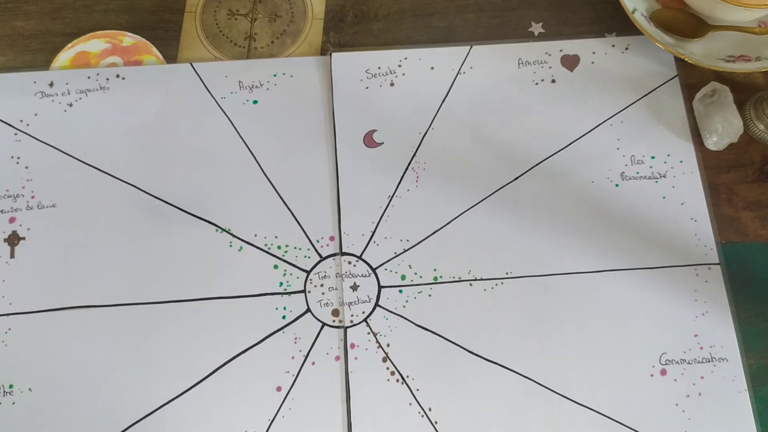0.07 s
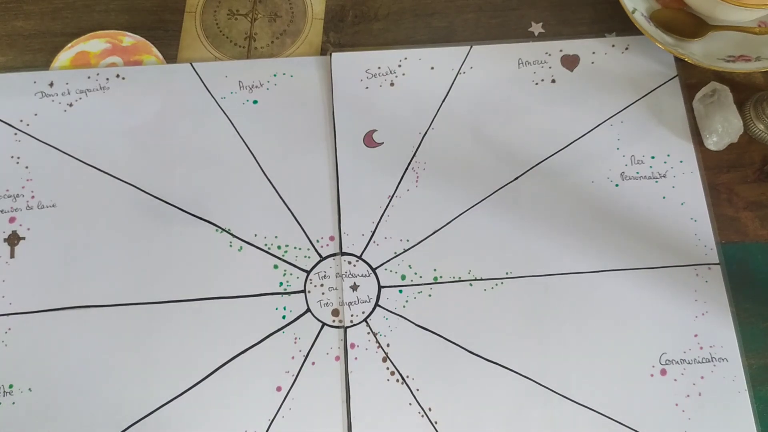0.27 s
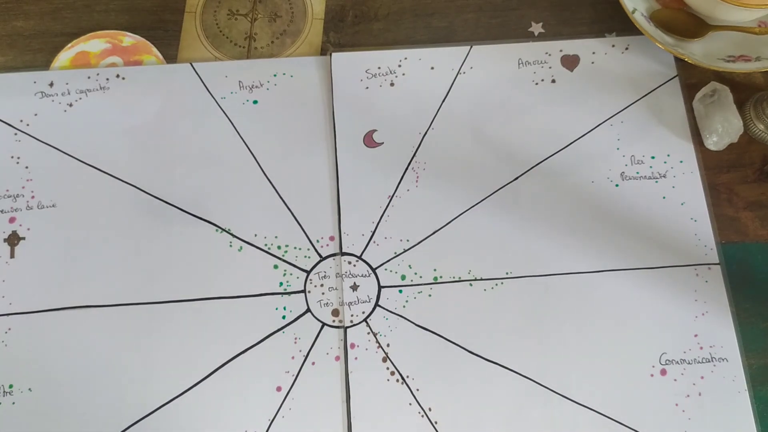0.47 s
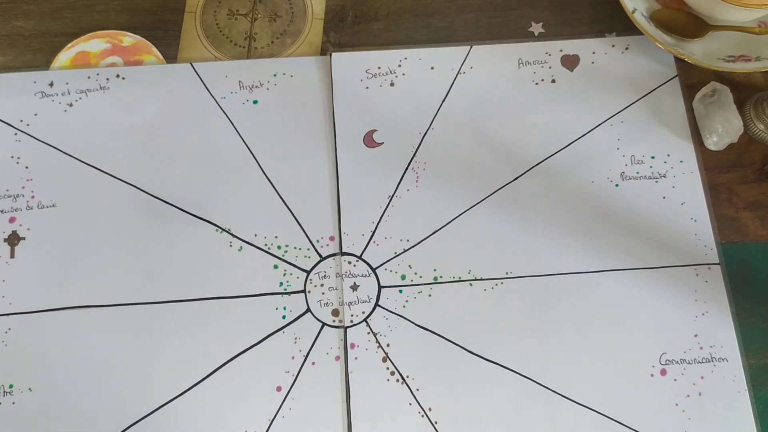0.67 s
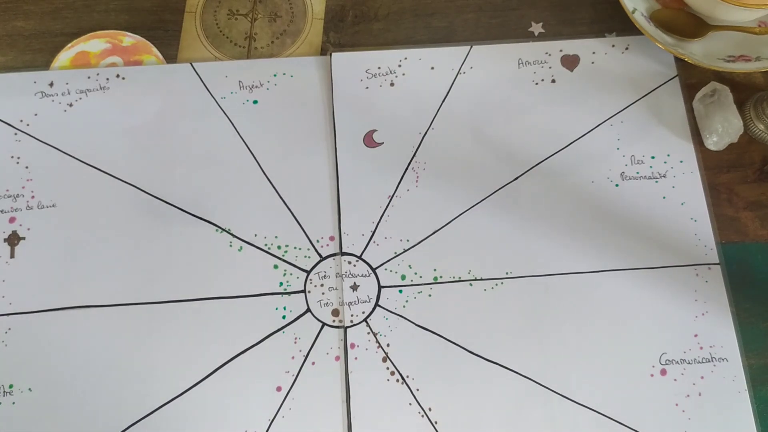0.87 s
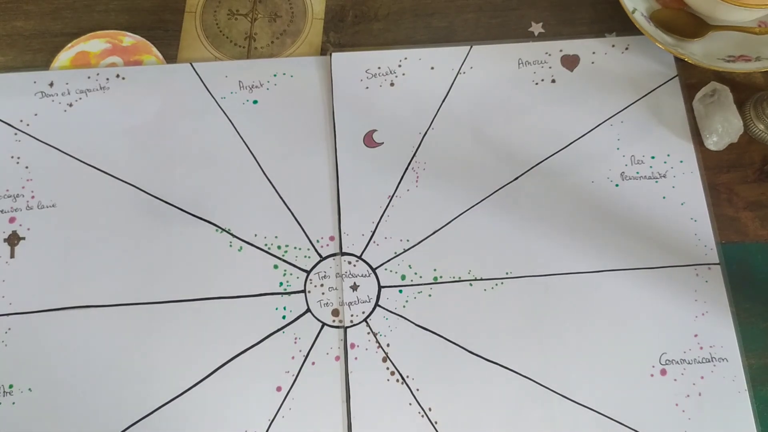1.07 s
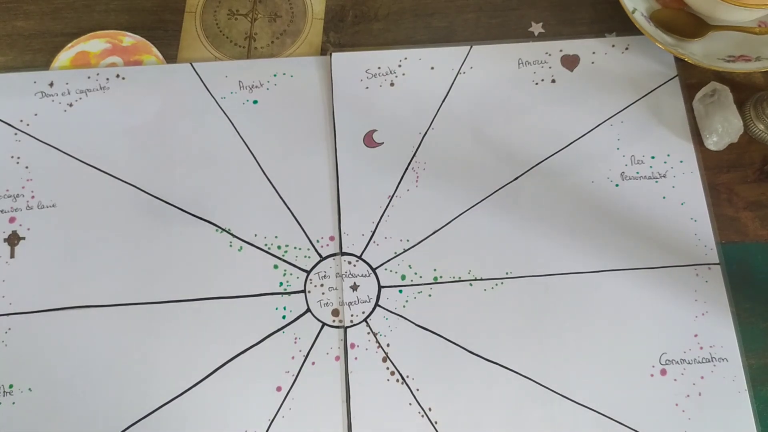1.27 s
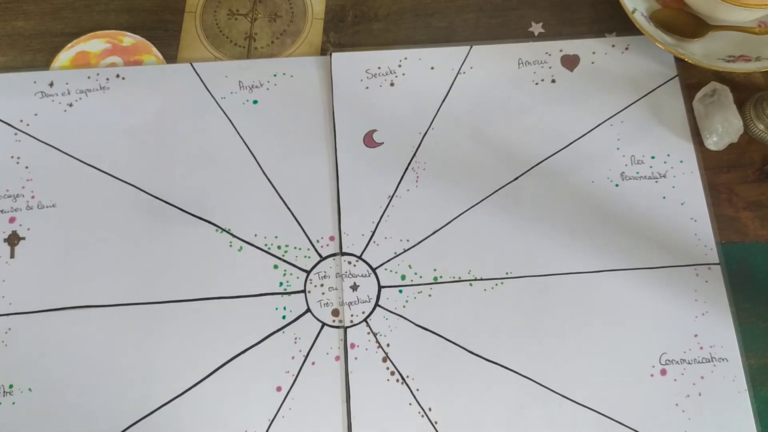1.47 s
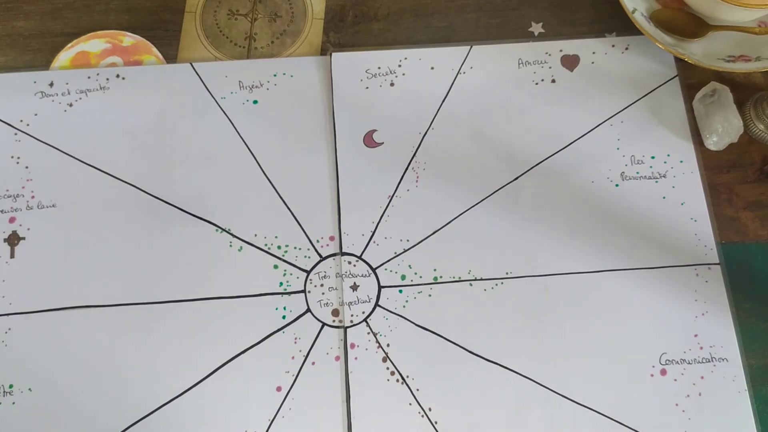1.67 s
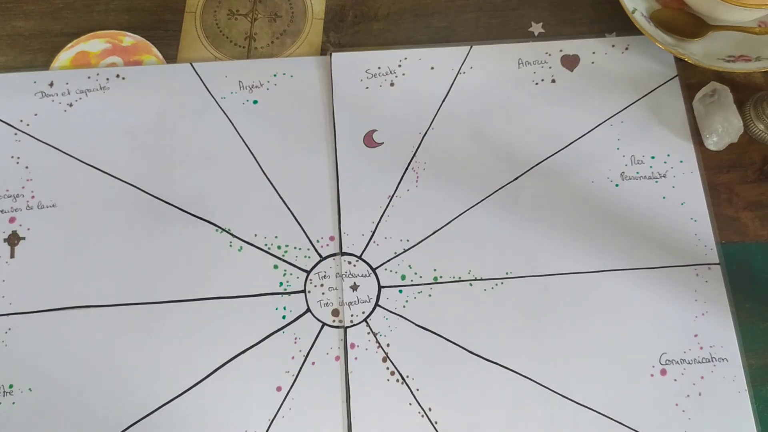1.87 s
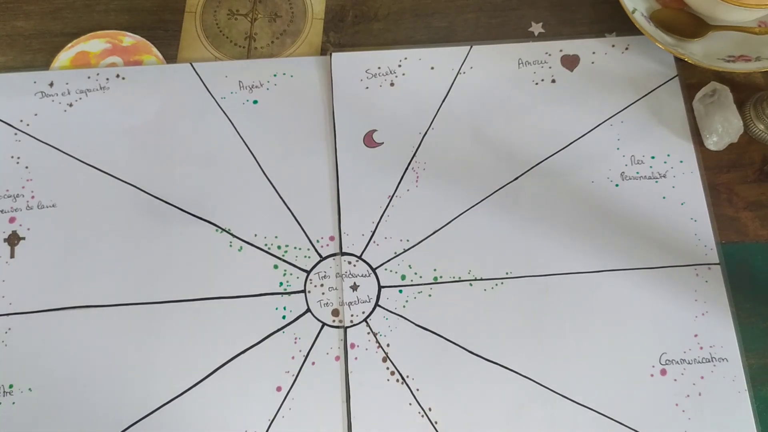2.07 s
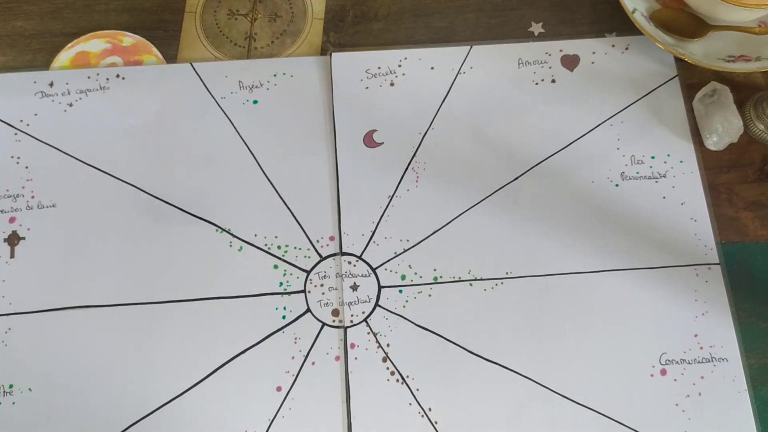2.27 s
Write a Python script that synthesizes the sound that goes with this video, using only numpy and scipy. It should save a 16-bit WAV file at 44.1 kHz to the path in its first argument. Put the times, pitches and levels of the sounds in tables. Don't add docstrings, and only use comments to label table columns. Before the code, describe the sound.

Small metal charms and pebbles rattle in a bowl from the very start, dense and bright, with hard clinks and stony cracks, strongest around 0.2 s. Faint hand rumble and low bowl hum lie beneath. Stirring eases until 1.1 s, where a sharp cluster lands; pieces settle in sparser, quieter ticks until 2.0 s. A faint charm drops at 2.2 s, with a last tap at 2.3 s. Close stereo, small quiet room.

```python
import sys
import numpy as np
from scipy import signal
from scipy.fft import rfft, irfft, next_fast_len
from scipy.io import wavfile
from scipy.ndimage import uniform_filter1d, map_coordinates

SR = 44100
rng = np.random.default_rng(int(sys.argv[2]) if len(sys.argv) > 2 else 0)


def linear_from_db(decibels):
    return 10 ** (np.asarray(decibels, float) / 20)


def generate_wav(sig):
    pcm = np.round(np.clip(np.atleast_2d(sig).T, -1, 1) * 32767).astype(np.int16)
    wavfile.write(sys.argv[1], SR, pcm)


N = 102444

# t/s, level/dB
STIR = [(0, -20), (.13, -23.5), (.2, -20), (.3, -20.5), (.36, -24.5), (0.449, -22), (0.566, -29.5),
        (0.617, -17.5), (.76, -26), (0.892, -25.5), (1.008, -26.5), (1.099, -22.5), (1.29, -28),
        (1.36, -35), (1.56, -34.5), (1.81, -44), (1.98, -47.5), (2.102, -63.5)]
# t/s, peak level/dB, f/Hz, tumble/s
KNOCKS = [(0.0084, -6, 2480, 0.0042), (0.0395, -14, 10000, 0.003), (0.0643, -7.5, 2400, 0.003),
          (0.0937, -10.5, 5560, 0.002), (0.148, -11, 2870, 0.0045), (0.195, -5, 5220, 0.012),
          (0.241, -0.5, 9580, 0.011), (0.2448, -1, 5380, 0.012), (0.273, -16.5, 9030, 0.022),
          (0.2997, -17, 2930, 0.013), (0.3477, -19, 2870, 0.019), (0.4652, -5.5, 2930, 0.013),
          (0.4742, -5.5, 8220, 0.0089), (0.4964, -11, 5270, 0.0034), (0.6042, -7, 5240, 0.0086),
          (0.611, -8.5, 9580, 0.017), (0.6257, -13, 10150, 0.0053), (0.6373, -7, 4970, 0.008),
          (0.704, -18, 2990, 0.013), (0.8198, -13.5, 5390, 0.012), (0.8315, -12, 8030, 0.0075),
          (0.8461, -11, 9840, 0.0053), (0.911, -12.5, 5300, 0.014), (0.936, -11, 2810, 0.016),
          (1.017, -12.5, 5340, 0.008), (1.0297, -17, 5340, 0.008), (1.0763, -9, 4420, 0.012),
          (1.0788, -9, 9700, 0.012),
          (1.1004, -8, 2570, 0.0045), (1.1067, -4, 5080, 0.0056), (1.1176, -9, 5050, 0.003),
          (1.233, -11, 5300, 0.0057), (1.2528, -14, 9700, 0.0052), (1.3026, -13, 9980, 0.0044),
          (1.374, -16, 2710, 0.0045), (1.4357, -12.5, 2870, 0.0044), (1.4672, -19.5, 4850, 0.0069),
          (1.5186, -13.5, 3100, 0.0059), (1.541, -19.5, 5330, 0.0054), (1.5542, -12.5, 3040, 0.0066),
          (1.5987, -23, 9600, 0.0052), (1.6362, -22.5, 3170, 0.0058), (1.6831, -26.5, 3170, 0.0043),
          (1.716, -15.5, 3250, 0.0073), (1.7602, -26.5, 3220, 0.0058), (1.8274, -25.5, 2820, 0.003),
          (1.8866, -23, 2810, 0.0052), (1.9433, -44.5, 9800, 0.0037), (1.9666, -26.5, 3000, 0.0052),
          (1.988, -32, 2730, 0.0049)]
# t/s, peak level/dB, f/Hz, tumble/s
MORE_KNOCKS = [(0.2134, 0.5, 3060, 0.0028), (0.379, -7, 2870, 0.003), (.407, -21, 2870, 0.0012),
               (0.7369, -5.5, 5300, .0018), (.788, -5, 9530, 0.0022), (1.726, -19.5, 3450, 0.0012),
               (1.817, -36, 9140, .002), (1.0129, -11.5, 9620, 0.007), (2.2082, -30, 2810, 0.0012),
               (2.3135, -19.5, 9150, 0.0013), (2.321, -25.5, 13600, 0.0009)]
# t/s, peak level/dB, centre f/Hz, T60/s
TICKS = [(0.0014, -10, 4840, 0.006), (0.0094, -22, 6700, 0.0054), (0.0214, -10, 5000, 0.006),
         (0.0373, -13, 10200, 0.006), (0.0644, -8, 5990, 0.006), (0.0916, -16, 5390, 0.006),
         (0.1264, -10, 8400, 0.006), (0.146, -8, 5080, 0.0073), (0.1604, -8, 5630, 0.006),
         (0.1677, -9, 4870, 0.006), (0.2414, -3, 5330, 0.0066), (0.406, -22, 10200, 0.006),
         (0.4649, -3.5, 8000, 0.0067), (0.6063, -8, 5050, 0.0053), (0.7356, -12, 5400, 0.006),
         (0.786, -14, 10100, 0.006), (0.8313, -8, 12400, 0.006), (1.016, -15, 5400, 0.006),
         (1.0468, -17, 5200, 0.006), (1.071, -5, 8360, 0.0065), (1.085, -6.5, 9600, 0.0071),
         (1.0915, -2, 5330, 0.006), (1.2352, -8.5, 5200, 0.0074), (1.2498, -8.5, 10200, 0.0063),
         (1.3026, -11, 9300, 0.0053), (1.3725, -21.5, 4580, 0.0066), (1.3838, -16.5, 5040, 0.0083),
         (1.4371, -10.5, 5110, 0.006), (1.5188, -21, 8210, 0.006), (1.5408, -15.5, 5600, 0.006),
         (1.5962, -20, 9800, 0.0066), (1.7038, -24.5, 6590, 0.006), (1.716, -25.5, 5200, 0.0054),
         (1.8175, -30, 9260, 0.006), (1.8444, -39.5, 9500, 0.006), (1.884, -28.5, 10800, 0.006),
         (1.955, -42, 6450, 0.006), (1.9666, -32, 7130, 0.006), (2.18, -34, 10630, 0.006),
         (2.208, -39.5, 6400, 0.006)]
# f/Hz, spread/Hz, level/dB
PIECES = [(2462.5, 57, 7), (2870, 36, 3.5), (3303, 84, 6), (5380, 510, 2.5), (5990, 130, -16.5),
          (6290, 47, 0), (7840, 510, 6), (9960, 260, 3.5), (10860, 100, 0), (12370, 350, 0.5),
          (12850, 85, -1.5), (13570, 120, -10.5), (14800, 31, -14), (13300, 390, 0)]
# f/Hz, level/dB
CLICK_COLOUR = [(1500, -19), (3000, 2), (4000, 8.5), (5400, 7), (7000, 2), (9900, 4.5), (13000, -9.5),
                (16000, -18.5)]
# f/Hz, level/dB, T60/s
LAST_CHARM = [(2810, -4.5, 0.22), (6850, -13, 0.3), (8200, -3, 0.061), (6620, -9, 0.096),
              (12000, -16, 0.064), (14200, -8.5, 0.25)]
# t/s, level/dB
AIR_PUMP = [(0.0, -44), (0.07, -44), (0.12, -55.5), (0.24, -47.5), (0.35, -63), (0.41, -49.5),
            (0.56, -56.5), (0.61, -51.5), (1.08, -52), (1.11, -47), (1.43, -57.5), (1.45, -56),
            (1.95, -64.5), (1.98, -53.5), (2.02, -76), (2.16, -73), (2.27, -101), (2.32, -48)]
# begins, shut, opens, open; t/s
TILT = (1.05, 1.351, 1.6, 1.701)
# f/Hz, level/dB
RUMBLE = [(20, -39.5), (60, -12), (150, 9.5), (250, -7), (800, -24), (1500, -56)]
# t/s, level/dB
THUDS = [
    (0.244, -29),
    (0.612, -36.5),
    (1.649, -47),
    (2.314, -47),
]
# f/Hz, width/Hz, level/dB
TABLE = [(75, 93, 11.5), (460, 230, 3), (913, 500, -15.5), (1570, 120, 27)]
# f/Hz, width/Hz, level/dB
WALL = [(1280, 374, 1), (740, 2200, -9.5), (1450, 67, -7)]
# f/Hz, level/dB
HUSH = [(15, -23), (25, -11), (76, -5.5), (326, -22.5), (439, -12), (659, -20), (962, -21), (2840, -19.5),
        (5000, -36), (16000, -54.5)]
# f/Hz, T60/s
ROOM = [(300, 0.18), (3000, 0.036), (12000, 0.15)]
# f/Hz, share/1
ALIKE = [(300, 0.18), (2500, 0), (6000, 1), (10000, 0.76)]
# f/Hz, left minus right level/dB
TREBLE_LEFT = [(2500, -0.5), (6000, 1.5), (10000, 4)]

PAN_SPREAD_DB, LAG_SPREAD_S = 3.5, .00002
TOP_HZ = 16200
SWELL = 0.3
SIDES = np.array([[1], [-1]])


def unit(x):
    return x / np.sqrt(np.mean(x ** 2) + 1e-20)


def along(points, hz):
    f, v = np.transpose(points)
    return np.interp(np.log(hz + 1), np.log(f + 1), v)


def filtered(x, response):
    m = next_fast_len(N + SR // 2)
    return irfft(rfft(x, m) * response(np.fft.rfftfreq(m, 1 / SR)), m)[..., :N]


def peaks(table):
    def response(f):
        total = 0
        for k, (centre, width, db) in enumerate(table):
            loss = 1j * f * width
            total = total + (-1) ** k * linear_from_db(db) * loss / (centre * centre - f * f + loss)
        return total
    return response


def wander(per_second):
    return map_coordinates(rng.standard_normal(150), [np.arange(N) * per_second / SR])


def grains(s, hz, db, t60, size):
    pan, lag, phase = rng.standard_normal((len(s), 3)).T
    t = np.arange(size) / SR
    contact = 1 - np.exp(-t / .0001)
    fade = linear_from_db(db[:, None] - 60 * t / t60[:, None]) * contact
    at = (np.clip(s, 0, N / SR) * SR).astype(int)[:, None] + np.arange(size)
    out = []
    for side in (1, -1):
        heard = t - side * LAG_SPREAD_S * lag[:, None]
        turn = 2 * np.pi * hz[:, None] * heard + phase[:, None]
        wave = linear_from_db(side * PAN_SPREAD_DB * pan / 2)[:, None] * fade * np.sin(turn)
        out.append(np.bincount(at.ravel(), wave.ravel(), N + size + 1)[:N])
    return np.array(out)


def rings(s, db, t60, count=11, order=28):
    which, pan, lag, sign = rng.random((len(s), 4)).T
    centre, spread, level = np.array(PIECES)[np.arange(order) % len(PIECES)].T
    out = np.zeros((2, N))
    for piece in range(count):
        off, life, scatter = rng.uniform(-1.117, 1, (3, order))
        hz = centre + (spread + 0.068 * centre) * off
        width = 2.2 / (t60 * 3 ** life)
        modes = np.c_[hz, width, level + 1.5 * scatter + 20 * np.log10(300 / width)]
        mine = (which * count).astype(int) == piece
        blows = []
        for side in (1, -1):
            when = s + side * 3 * LAG_SPREAD_S * (lag - .5)
            force = np.sign(sign - .5) * linear_from_db(db + side * 3 * PAN_SPREAD_DB * (pan - .5) / 2)
            at = np.clip(when[mine] * SR, 0, N - 1).astype(int)
            blows.append(np.bincount(at, force[mine], N))
        out += filtered(np.array(blows), peaks(modes))
    return out


def clicks(s, db):
    hz = 1500 + 14800 * rng.random(len(s)) ** 1.5
    return grains(s, hz, db + along(CLICK_COLOUR, hz), 9.8 / hz + 0.0017, size=160)


def radiated(f):
    notch = 1 - .85 * peaks([(3980, 900, 0)])(f)
    shine = 1 + 1j * f / 11800
    return notch * shine * (1j * f / (1090 + 1j * f)) ** 4


def strength():
    return np.interp(np.arange(N) / SR, *np.transpose(STIR))


def stirring(count=3000):
    s, size = rng.random((4 * count, 2)).T
    s = s * N / SR
    db = -np.log(size + 0.0024)
    ringing = linear_from_db(-3.5) * unit(rings(s[:count], db[:count], t60=0.028))
    clicking = linear_from_db(-0.5 + 0.14 * (strength() + 22)) * unit(clicks(s, db))
    return linear_from_db(strength() + 2 * wander(62)) * (ringing + clicking)


def wall(pieces):
    push = np.sqrt(abs(uniform_filter1d(pieces.mean(0) ** 2, size=130)))
    buzz = rng.standard_normal(N) + 0.87 * rng.standard_normal((2, N))
    return linear_from_db(-22.5) * push * unit(filtered(buzz, peaks(WALL)))


def bowl_air():
    shut = np.interp(np.arange(N) / SR, TILT, [0, 1, 1, 0])
    breeze = np.sqrt(linear_from_db(3.5 * wander(45))) * rng.standard_normal(N)
    hum = np.zeros(N)
    for hz, share in ((365.5, 1 - shut), (320, shut)):
        resonance = peaks([(hz, 102, 0)])
        hum += filtered(share * breeze, lambda f: resonance(f) ** 2)
    pump = np.interp(np.arange(N) / SR, *np.transpose(AIR_PUMP))
    return linear_from_db(0.5 + pump) * unit(hum)


def hand_rumble():
    lumps = linear_from_db(3.5 * np.array([wander(45), wander(45)]))
    rub = unit(filtered(lumps * rng.standard_normal((2, N)), lambda f: linear_from_db(along(RUMBLE, f))))
    return linear_from_db(0.79 * (strength() + 28.5) - 69.5) * rub * linear_from_db(3 * SIDES)


def room_tone():
    noise = rng.standard_normal((2, N))
    return linear_from_db(-65.5) * unit(filtered(noise, lambda f: linear_from_db(along(HUSH, f))))


def ticks(count=24):
    s, db, hz, t60 = np.repeat(TICKS, count, axis=0).T
    off, late = rng.standard_normal((len(s), 2)).T
    spread = hz * 2 ** (.55 * off)
    folded = abs(14740 - abs(14740 - spread))
    return grains(s + .0004 * abs(late), folded, db - 15, t60, size=700)


def knocks(count=40):
    s, db, hz, tumble = np.array(KNOCKS + MORE_KNOCKS).T
    t60 = 0.0075
    after = rng.random((len(s), count)) ** 1.4
    when = s[:, None] + 2 * (after - .05) * tumble[:, None]
    level = db[:, None] - 18.5 * abs(after - SWELL)
    some = slice(0, None, 5)
    ring = rings(when[:, some].ravel(), level[:, some].ravel() - 0.5, 1.9 * t60)
    click = clicks(when.ravel(), level.ravel() - 9.5)
    pitched = grains(s + SWELL * tumble, hz, db + 2.5, t60 + 0 * s, size=900)
    return pitched + ring + click


def room(x):
    hz, t, z = signal.stft(rng.standard_normal((3, SR // 3)), SR, nperseg=256)
    alike = along(ALIKE, hz)[:, None]
    z = np.sqrt(alike) * z[2] + np.sqrt(1 - alike) * z[:2]
    tail = signal.istft(z * linear_from_db(-60 * t / along(ROOM, hz)[:, None]), SR, nperseg=256)[1]
    tail = tail / np.linalg.norm(tail[0])
    late = np.pad(x.mean(0), (90, 0))[None]
    return linear_from_db(-3) * signal.fftconvolve(late, tail, axes=1)[:, :N]


def table_bumps():
    blows = np.zeros(N)
    for s, db in THUDS:
        blows[round(s * SR):][:40] = linear_from_db(db) * np.hanning(40)
    resonances = peaks(TABLE)
    thud = filtered(blows, lambda f: resonances(f) * (1j * f / (45 + 1j * f)) ** 2)
    return thud * linear_from_db(2 * SIDES)


def last_charm():
    hz, db, t60 = np.repeat(LAST_CHARM, 4, axis=0).T
    hz = hz * (1 + 0.022 * rng.standard_normal(len(t60)))
    return grains(2.209 + 0 * t60, hz, db - 49, t60, size=6000)


def scene():
    pieces = filtered(stirring() + knocks() + last_charm(), radiated)
    cracks = filtered(ticks(), radiated)
    low = bowl_air() + hand_rumble() + table_bumps()
    answer = room(pieces + .4 * cracks)
    return pieces + cracks + wall(pieces) + low + answer + room_tone()


def band_limit(x):
    return signal.sosfilt(signal.butter(12, 16400, fs=SR, output="sos"), x)


def record(dry):
    def ports(f):
        treble = linear_from_db(SIDES * along(TREBLE_LEFT, f) / 2)
        delay = np.exp(-2j * np.pi * f * SIDES * .000017)
        return treble * delay * (f < TOP_HZ)

    x = filtered(dry, ports)
    excess = x - x / (1 + abs(x / 0.86) ** 4) ** .25
    mix = x - filtered(excess, lambda f: (f < TOP_HZ) * (f > 1500))
    return band_limit(mix)


dry = scene()
out = record(dry)
generate_wav(out)
```